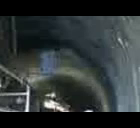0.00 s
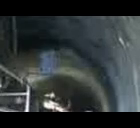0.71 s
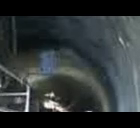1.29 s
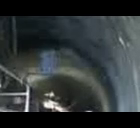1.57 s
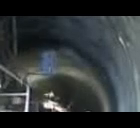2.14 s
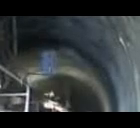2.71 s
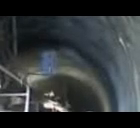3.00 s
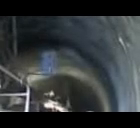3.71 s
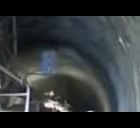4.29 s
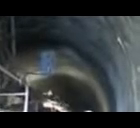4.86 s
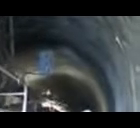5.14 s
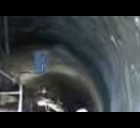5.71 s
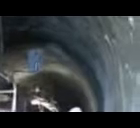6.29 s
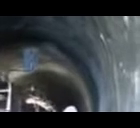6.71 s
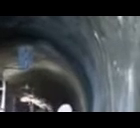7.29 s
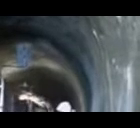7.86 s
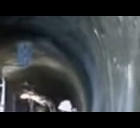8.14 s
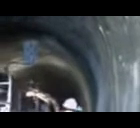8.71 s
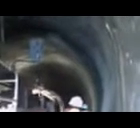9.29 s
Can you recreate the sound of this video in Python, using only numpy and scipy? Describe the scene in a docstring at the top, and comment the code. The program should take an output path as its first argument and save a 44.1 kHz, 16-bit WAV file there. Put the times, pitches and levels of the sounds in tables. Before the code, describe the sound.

A gritty jet of air and wet concrete roars against a tunnel wall while the delivery hose rumbles. A pump whines over the hum of a fan and a compressor. Twice the pipe gurgles hollowly, then the whine swells with a new stroke. A few stones knock in the steel pipe, mostly in the second half. The sound is dull and narrow, starting with a brief overloaded blast before settling.

```python
"""Spraying concrete in a tunnel

A turbulent air jet throws grit at the rock while the delivery line rumbles, surges and knocks.
A piston pump whines under changing load, a fan and a compressor hum, and wall reflections blur the roar.
A narrow-band recorder opens at high gain, overloads for an instant and then turns itself down."""
import sys
import numpy as np
from scipy import signal
from scipy.fft import rfft, irfft, next_fast_len
from scipy.io import wavfile
from scipy.ndimage import uniform_filter1d

SR = 44100
rng = np.random.default_rng(int(sys.argv[2]) if len(sys.argv) > 2 else 0)


def dump_mix(stems):
    """Bounce the given channels to the path in sys.argv[1] as a 16-bit WAV at rate SR."""
    frames = np.atleast_2d(stems).T  # one column per channel
    limited = np.clip(frames, -1, 1)  # hard clip at full scale
    pcm = np.round(limited * 32767).astype(np.int16)
    wavfile.write(sys.argv[1], SR, pcm)


N = 418509
TIME_S = np.arange(N) / SR
BAND_EDGE_HZ = 4000


# The spectrum of the spray. Each row: frequency in Hz, relative density in dB.
JET_SPECTRUM = [(250, -17), (500, -8.5), (660, 0), (800, -1.4), (930, 1.07), (1200, -2.5), (1500, -4),
                (1720, -1), (2100, -7.5), (2500, -11.5), (2800, -14.5), (3250, -14.5), (3600, -21.5),
                (3900, -28.5), (4300, -38)]

def jet(grains_per_s=1500, split_hz=1300):
    """Turbulence and random impacts: air and grit make broadband noise, brighter as the jet grows."""
    _, change_db, _ = level_changes()
    level_db = -29.35 - pressure() + 1.5 * thinning() + change_db   # a full feed muffles the jet
    sizes = from_db(3.5 * np.minimum(rng.exponential(1, N), 4)) * rng.choice([-1, 1], N)
    impacts = sizes * (rng.random(N) < grains_per_s / SR)
    grit = from_db(-4) * tunnel(impacts, wet_db=-0.5)
    spray = patchy(rng.standard_normal(N) + grit, depth_db=1.4, rate_hz=22)
    spray = coloured(spray, JET_SPECTRUM)
    lows = signal.lfilter(*signal.butter(1, split_hz, fs=SR), spray)
    tilt = from_db(0.24 * (level_db - np.median(level_db)))
    sputter_db = 0.42 * flutter(30)
    return from_db(level_db + sputter_db) * (lows / tilt + (spray - lows) * tilt)


# The spectrum of the rumble. Each row: frequency in Hz, relative density in dB.
HOSE_SPECTRUM = [(20, -35.5), (45, -24), (80, -17), (190, -12.5), (235, -4), (290, -2.5), (350, 2.5),
                 (420, 2), (490, -3.5), (650, -1.5), (1000, -15.5), (2000, -36.5)]

def hose():
    """Flow noise: lumps of wet concrete tumble through the hose and modulate its rumble."""
    change_db, _, _ = level_changes()
    level_db = -35.53 - 0.5 * thinning() + change_db
    churn = rng.standard_normal(N) * from_db(1.17 * flutter(24))
    return from_db(level_db) * coloured(churn, HOSE_SPECTRUM)


# Brief swells and dips in loudness. Each row: centre and half length in seconds, then the change of
# the rumble, of the spray and of the whine in dB.
LEVEL_SWELLS = [ (0.181, 0.06, 0.5, -0.5, 7), (0.296, 0.06, 4, 0.5, 5.5), (0.563, 0.1, 2, -1.5, -11),
                (1.1, 0.17, -0.5, -0.5, 1), (1.85, .22, 0.5, 0, -4.5), (2.297, .12, 1.5, 0, -1),
                (3.07, .14, -5, 1.2, -2.5), (3.45, .15, -1.5, 0.5, -1.5), (4.205, 0.23, 0, 0.5, -4),
                (5.606, 0.052, 7, -1.5, -1.5), (5.84, 0.056, 8.5, 0, -5), (5.951, 0.062, 4, 4.5, 5.5),
                (6.093, 0.078, 4.5, 3.5, -4.5), (6.576, 0.26, -1, 0, -5.5), (6.962, 0.071, 4, -0.7, -1),
                (7.752, 0.097, 4.5, 2.5, -0.5), (8.15, .2, -1, 0, 0.5), (8.85, 0.25, -1, 0.3, -8), ]

def level_changes():
    """Amplitude modulation: brief swells and dips in the rumble, the spray and the whine, in dB."""
    return sum(np.outer(changes_db, swell(s, half_s, half_s)) for s, half_s, *changes_db in LEVEL_SWELLS)


# The pump's strokes. Each entry: start in seconds.
STROKE_STARTS = [3.09, 9.15]

def stroke_ages():
    """Reciprocating drive: one row per stroke of the seconds since it began, zero before it."""
    return np.maximum(TIME_S - np.array(STROKE_STARTS)[:, None], 0)


def pressure(rise_s=0.18, hold_s=2, ease_s=5.8):
    """Piston load, 0 to 1: pressure builds, holds, then eases as the cylinder empties."""
    age_s = stroke_ages()
    load = np.minimum(age_s / rise_s, 1 - (age_s - hold_s) / ease_s)
    return np.clip(load, 0, 1).max(axis=0)


def thinning(lead_s=0.06):
    """Interrupted flow, 0 to 1: just before each stroke the line carries more air and less concrete."""
    return sum(swell(s - lead_s, rise_s=0.3, fall_s=0.09) for s in STROKE_STARTS)


# The hollow ring of the pipe. Each row: frequency in Hz, relative density in dB.
GURGLE_SPECTRUM = [(400, -26), (600, -10), (720, 2.5), (880, 0.5), (1080, -4), (1350, -17.5), (2200, -33)]

def gurgle(lead_s=0.55):
    """Cavity resonance: air enters the line as each cylinder runs empty, and the pipe rings hollow."""
    emptiness = sum(swell(s - lead_s, rise_s=0.24, fall_s=0.3) for s in STROKE_STARTS)
    bubbling = rng.standard_normal(N) * from_db(2.1 * flutter(40))
    return from_db(-36.5) * emptiness * coloured(bubbling, GURGLE_SPECTRUM)


# Stones striking the pipe. Each row: start in seconds, level in dB, treble tilt in dB per octave.
STONE_HITS = [(2.985, -28, -3), (5.628, -26, -2), (5.85, -30, 1), (6.06, -23, -2), (8.094, -21, -4.5),
              (8.785, -18, -9), (8.799, -25, -8)]
# The pipe's modes. Each row: frequency in Hz, relative level in dB, time to fall 60 dB in seconds.
STEEL_MODES = [(255, -7, 0.16), (375, -12.5, .06), (764, -1, 0.054), (1130, -11.5, .04), (1544, -10, 0.036),
               (1922, 1, 0.044), (2385, -11, 0.027)]

def knocks(spread_db=4.5, tilt_from_hz=800, low_cut_hz=260):
    """Modal ringing: each stone excites the steel pipe's damped modes with strengths of its own."""
    modes = np.array(STEEL_MODES)
    octaves_up = np.maximum(np.log2(modes[:, 0] / tilt_from_hz), 0)
    chances_db = spread_db * rng.standard_normal((len(STONE_HITS), len(modes)))
    ringing = np.zeros(N)
    for (s, db, tilt_db), chance_db in zip(STONE_HITS, chances_db):
        near = (TIME_S >= s) & (TIME_S < s + 0.5)
        age_s = TIME_S[near] - s
        for (hz, mode_db, t60_s), own_db in zip(modes, chance_db + tilt_db * octaves_up):
            envelope = from_db(db + mode_db + own_db - 60 * age_s / t60_s)
            ringing[near] += envelope * np.sin(2 * np.pi * hz * age_s)
    # the knocks carry little bass
    return signal.sosfilt(signal.butter(3, low_cut_hz, "high", fs=SR, output="sos"), ringing)


# The whine's harmonics. Each row: multiple of the piston rate, relative level in dB.
PISTON_HARMONICS = [(3, 2), (4, -23)]

def pump_whine(rest_hz=672, cycle_s=2.4, settle_s=1.1):
    """Pressure ripple in the oil: under each stroke's load the whine swells and the motor slows."""
    age_s = stroke_ages()
    _, _, change_db = level_changes()
    # the speed sags, overshoots and settles
    sag = np.sum(np.exp(-age_s / settle_s) * np.sin(2 * np.pi * age_s / cycle_s), axis=0)
    piston_hz = (rest_hz - 9.04 * sag) / 3   # the main whine is the third harmonic
    level_db = -41.5 + 8.5 * pressure() - 0.5 * np.maximum(sag, 0) + change_db
    return sum(from_db(level_db + db) * tone(order * piston_hz, scatter=0.16, scatter_hz=26)
               for order, db in PISTON_HARMONICS)


# The pump's fixed tones. Each row: frequency in Hz, base level in dB.
PUMP_TONES = [(223.8, -58), (447.6, -46)]
# Their shared rise and fall. Each row: time in seconds, change of level in dB.
PUMP_TONE_CHANGES = [(0, 0), (2.25, 4), (2.8, -6.5), (4.2, 4.5), (4.7, -12), (5.45, -9.5), (5.8, 3),
                     (6.4, -4), (7.5, 3.5), (7.85, 6), (8.4, 6.5), (8.7, -11.5), (9.4, 2.5)]

def pump_hum():
    """Periodic vibration: the pump hums at two fixed pitches that swell and sink together."""
    change_db = in_time(PUMP_TONE_CHANGES)
    return sum(hum(hz, db + change_db) for hz, db in PUMP_TONES)


# The fan's upper tones. Each row: frequency in Hz, mean level in dB.
FAN_TONES = [(496, -53), (743.8, -41), (1243, -52), (1738, -53), (2995, -62)]
# The course of its lowest tone. Each row: time in seconds, level in dB.
BLADE_TONE_LEVELS = [(0, -48), (1.1, -43.5), (1.7, -49), (3.3, -47), (4.2, -52), (5.6, -43.5), (7, -48.5),
                     (9.4, -48.5)]

def fan(blade_hz=246.9):
    """Blade-passing tones: a ventilation fan at constant speed sounds a fundamental and overtones."""
    return hum(blade_hz, in_time(BLADE_TONE_LEVELS)) + fading_hums(FAN_TONES)


# The compressor's hum. Each row: frequency in Hz, mean level in dB.
COMPRESSOR_TONES = [(384.6, -45.5), (1504, -49.5)]
# The swells of its whir. Each row: centre and half length in seconds, rise in dB.
WHIR_SWELLS = [(0.95, .55, 10), (2.874, 0.16, 12), (4.479, 0.32, 15.5), (6.452, 0.87, 11), (8.95, 0.31, 15)]

def compressor(whir_hz=769):
    """Rotational tones: a compressor hums at constant speed, and its whir swells now and then."""
    whir_db = -52.5 + sum(db * swell(s, half_s, half_s) for s, half_s, db in WHIR_SWELLS)
    return hum(whir_hz, whir_db) + fading_hums(COMPRESSOR_TONES)


# The opening flares of treble. Each row: time of the peak in seconds, peak level in dB.
FLARE_PEAKS = [(0.134, -33.5), (0.178, -32.5), (0.222, -41)]
# Their spectrum. Each row: frequency in Hz, relative density in dB.
FLARE_SPECTRUM = [(400,2), (1200,2.5), (2400,0), (3000,-1.5), (3800,-9), (4300,-17.5)]

def flare(slope_db_per_s=182.5):
    """Noise bursts with exponential flanks: a bright rasp rides on the roar for a moment."""
    envelope = sum(from_db(db - slope_db_per_s * np.abs(TIME_S - s)) for s, db in FLARE_PEAKS)
    return envelope * coloured(rng.standard_normal(N), FLARE_SPECTRUM)


# The spectrum of the far boom. Each row: frequency in Hz, relative density in dB.
DRONE_SPECTRUM = [(20, -19), (45, -8.5), (80, -2), (130, -2), (200, -3), (400, -20.5), (1000, -51)]

def drone():
    """Low-frequency background noise: far machinery fills the tunnel with an even boom."""
    return from_db(-54) * coloured(rng.standard_normal(N), DRONE_SPECTRUM)


def tunnel(x, wet_db, t60_s=1):
    """Reverberation: direct sound plus a dense, dying tail of wall reflections, at unit power."""
    tail = rng.standard_normal(SR) * from_db(-60 * TIME_S[:SR] / t60_s)
    echoes = signal.fftconvolve(x, tail / np.sqrt(np.sum(tail ** 2)))[:N]
    return rms_one(x + from_db(wet_db) * echoes)


def tone(hz, scatter, scatter_hz):
    """Interference: reflections join a tone with wandering strength and phase, at unit power."""
    phase = 2 * np.pi * np.cumsum(hz * np.ones(N)) / SR
    in_phase = 1 + scatter * drift(scatter_hz)
    quadrature = scatter * drift(scatter_hz)
    return rms_one(in_phase * np.sin(phase) + quadrature * np.cos(phase))


def hum(hz, db):
    """Multipath spreading: reflections blur a distant machine's tone, the more the higher it is."""
    return from_db(db) * tone(hz, scatter=0.42, scatter_hz=hz / 60)


def fading_hums(tones, depth_db=1.4, rate_hz=0.66):
    """Slow amplitude modulation: each hum swells and fades by itself."""
    return sum(hum(hz, db + depth_db * drift(rate_hz)) for hz, db in tones)


def patchy(x, depth_db, rate_hz, count=16):
    """Independent modulation of bands: each swells and sinks, so the colour keeps shifting."""
    size = next_fast_len(N)
    spectrum, bins_hz = rfft(x, size), np.arange(size // 2 + 1) * SR / size
    centres_hz = np.linspace(0, BAND_EDGE_HZ, count) ** 2 / BAND_EDGE_HZ
    bands = (irfft(spectrum * np.interp(bins_hz, centres_hz, row), size)[:N] for row in np.eye(count))
    return sum(band * from_db(depth_db * flutter(rate_hz)) for band in bands)


def coloured(x, spectrum):
    """Spectral shaping: filter a sound by a curve of (Hz, dB) rows, at unit power."""
    hz, db = np.transpose(spectrum)
    size = next_fast_len(N)
    bins_hz = np.maximum(np.arange(size // 2 + 1) * SR / size, 1)
    gain = from_db(np.interp(np.log(bins_hz), np.log(hz), db))
    bass_rolloff = np.minimum(bins_hz / hz[0], 1)
    return rms_one(irfft(rfft(x, size) * gain * bass_rolloff, size)[:N])


def drift(rate_hz, step=40, warm_up=2000):
    """Low-passed noise: a smooth random wander of spread 1."""
    pole = np.exp(-2 * np.pi * step * rate_hz / SR)
    noise = rng.standard_normal(N // step + warm_up + 2)
    slow = signal.lfilter([1], [1, -2 * pole, pole * pole], noise)[warm_up:]
    return np.interp(np.arange(N) / step, np.arange(len(slow)), rms_one(slow))


def flutter(rate_hz, even_s=0.25):
    """Band-passed noise: a quick wander of spread 1 that evens out over longer stretches."""
    wander = drift(rate_hz)
    return rms_one(wander - uniform_filter1d(wander, int(even_s * SR)))


def swell(peak_s, rise_s, fall_s):
    """A Gaussian bump of height 1 with its own rise and fall."""
    t = TIME_S - peak_s
    return np.exp(-(t / np.where(t < 0, rise_s, fall_s)) ** 2)


def in_time(rows):
    """Linear interpolation of (seconds, value) rows to every sample."""
    return np.interp(TIME_S, *np.transpose(rows))


def from_db(db):
    """Decibels to amplitude ratio."""
    return 10 ** (np.asarray(db) / 20)


def rms_one(x):
    """Normalisation to unit power."""
    return x / np.sqrt(np.mean(x ** 2) + 1e-20)


def scene():
    """Superposition: all the sources add at one microphone."""
    roar = hose() + jet() + gurgle() + drone() + knocks() + flare()
    return (roar + pump_whine() + pump_hum() + fan() + compressor())[None]


def detector(x, time_constant_s):
    """Envelope detection: rectify, then smooth with one pole."""
    pole = np.exp(-1 / (time_constant_s * SR))
    return signal.lfilter([1 - pole], [1, -pole], np.abs(x))


def gain_control(x, range_db=27.5, full_db=-34.5):
    """Automatic gain control: the gain starts high and falls to unity as a slow detector charges."""
    charge = detector(x, 0.88) / from_db(full_db)
    return x / np.clip(charge + from_db(-range_db), 0, 1)


def limiter(x, knee_db=-13, attack_s=0.0153, release_db_per_s=90):
    """Limiting: the gain ducks shortly after an overload begins, then recovers."""
    level_db = 20 * np.log10(detector(x, attack_s) + 1e-9)
    fall_db = release_db_per_s * TIME_S
    held_db = np.maximum.accumulate(level_db + fall_db, axis=-1) - fall_db
    return x * from_db(np.minimum(knee_db - held_db, 0))


def record(dry, fade_from_s=0.1174, fade_to_s=0.1365):
    """Compression and band limiting: the input fades in, is levelled and narrowed, and peaks clip."""
    opening = np.clip((TIME_S - fade_from_s) / (fade_to_s - fade_from_s), 0, 1) ** 2
    levelled = limiter(gain_control(dry * opening))
    narrow = signal.sosfilt(signal.ellip(10, 0.3, 90, BAND_EDGE_HZ, fs=SR, output="sos"), levelled)
    return signal.sosfilt(signal.butter(10, 15000, fs=SR, output="sos"), np.clip(narrow, -1, 1))


dry = scene()
out = record(dry)
dump_mix(out)
```